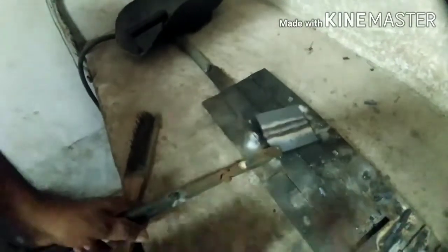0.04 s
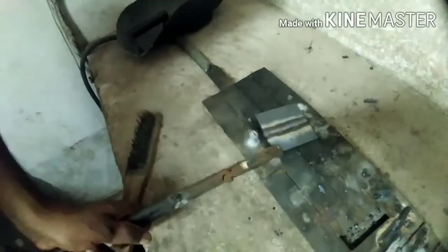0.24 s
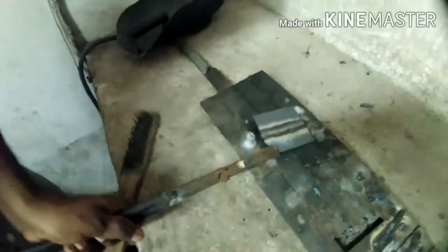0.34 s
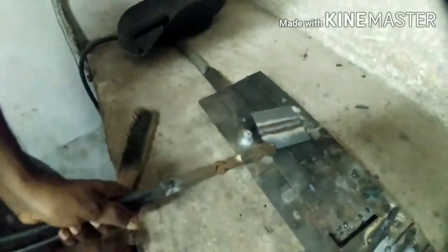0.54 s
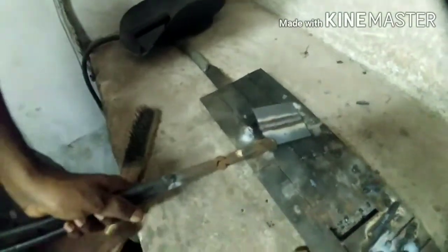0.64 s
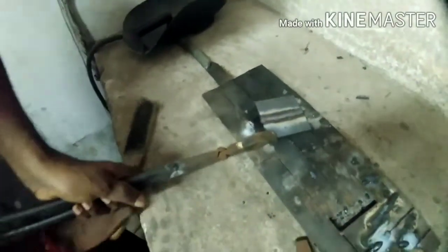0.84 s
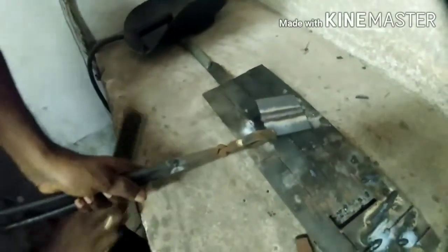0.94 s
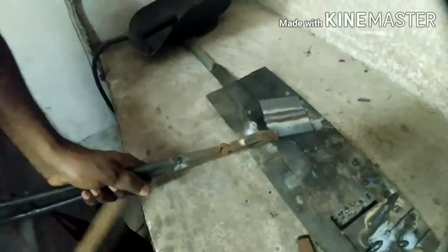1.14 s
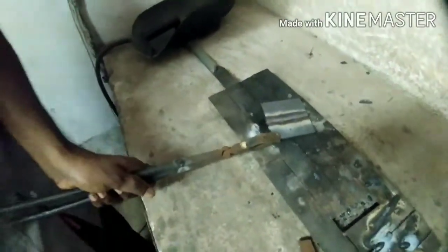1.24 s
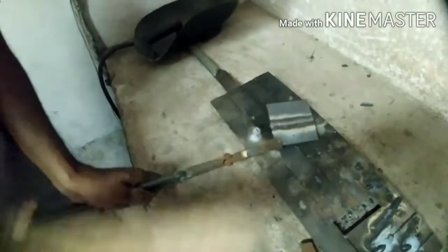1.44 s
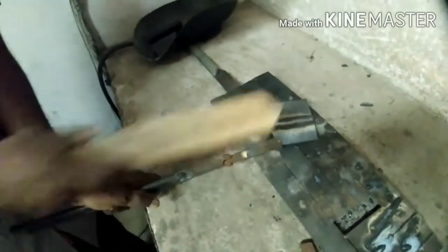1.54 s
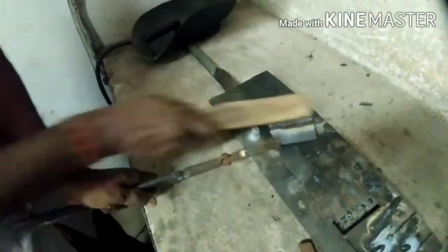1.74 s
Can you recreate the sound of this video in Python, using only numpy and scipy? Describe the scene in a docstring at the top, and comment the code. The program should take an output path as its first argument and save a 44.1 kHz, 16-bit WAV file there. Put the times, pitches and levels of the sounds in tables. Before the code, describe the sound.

Metal tool dropped on a workshop floor, sharp clanks and short high ring over low machine hum

```python
"""Steel tool dropped in a workshop

A steel hand tool falls on concrete: its blows are shaped noise that excites the damped modes of its body.
Bouncing free, the steel rings in bright sines; a wire brush scratches faintly in dense random clicks.
Machines hum, whistle and whine towards the left over a rumble, and a small room answers the blows.
The phone turns down a channel that holds little treble, rounds the peaks and cuts the top."""
import sys
import numpy as np
from scipy import signal
from scipy.fft import rfft, irfft
from scipy.io import wavfile
from scipy.ndimage import uniform_filter1d

SR = 44100
rng = np.random.default_rng(int(sys.argv[2]) if len(sys.argv) > 2 else 0)


def digitize_waveform(pressure):
    """Quantize a signal to 16-bit integers and store it at the path in sys.argv[1].

    Rows of a 2-D input are taken as channels; values are limited to [-1, 1].
    """
    field = np.atleast_2d(pressure).T
    bounded = np.clip(field, -1, 1)
    quanta = np.round(bounded * 32767).astype(np.int16)
    wavfile.write(sys.argv[1], SR, quanta)


N = 79380  # length [samples]

# Band centres of the blow levels: (frequency [Hz])
BAND_HZ = [130, 550, 1800, 3800, 7500, 12500]
# Blows of the tool: (time [s], thud, knock, clank, crack, hiss, sizzle [dB, before the shared colour],
# hold [s], fade to 1/e [s], left over right [dB])
BLOWS = [(0.2378, -28, -18, -6.5, -9, -13, -20, 0.012, 0.011, 2.5),
         (0.273, -31, -29.5, -20.5, -27, -29.5, -33.5, 0.0096, 0.038, 2),
         (0.3396, -25.5, -9, -2.5, -17, -23, -14, 0.0056, 0.0046, 2.5),
         (0.366, -33, -19.5, -6.5, -24.5, -34.5, -24, 0.0033, 0.0036, 1),
         (0.4112, -24.5, -12.5, -15, -25.5, -33, -28.5, 0.0062, 0.0031, 4),
         (0.42, -21.5, -18, -12.5, -7, -13, -11.5, 0.011, 0.012, 2),
         (0.484, -29, -19, -13, -22, -12, -8, 0.0033, 0.015, 2),
         (0.529, -34.5, -25, -29.5, -35, -38, -41, 0.0086, 0.07, -1),
         (0.563, -30.5, -22, -15.5, -28.5, -25.5, -27, 0.011, 0.01, 2.5),
         (0.613, -44, -13.5, -17.5, -24, -21, -34.5, 0.0039, 0.0078, 2.5),
         (0.63, -50.5, -23.5, -17.5, -24.5, -27.5, -27, 0.0058, 0.0076, 3),
         (0.652, -50, -27.5, -23, -30.5, -43, -25, 0.0038, 0.018, 4)]
# Colour shared by all blows: (frequency [Hz], level [dB])
CRASH_COLOUR = [(25, -26), (50, -12), (90, -7), (200, 1.5), (260, -5), (340, 0), (520, -6.5), (800, -2.5),
                (1050, -0.5), (2300, 3), (2900, 1.5), (3700, 3.5), (4900, 1.5), (6200, -2.5), (8500, 4.5),
                (11000, 2.5), (14300, 5.5), (15500, -13)]
CLATTER_DB, GRIT_DB = -3, 1.5  # overall gain; depth of the fast level fluctuation


def clatter():
    """Impact excitation: each blow of steel on concrete is a short gritty burst of broadband noise."""
    gritty_noise = spread(noise()) * amp(GRIT_DB * walk(900))
    equal_per_octave = np.sqrt(SR / 2 / bins() / np.log(2))
    shared_colour = amp(CLATTER_DB + on_bins(CRASH_COLOUR))
    grit = rfft(gritty_noise) * ripple() * equal_per_octave * shared_colour
    out = 0
    for start, *levels, hold, fade, side in BLOWS:
        blow_colour = amp(on_bins(list(zip(BAND_HZ, levels))))
        crash = irfft(grit * blow_colour, N)
        out = out + crash * envelope(start, 0.00074, hold, fade) * pan(side)
    return out


# Hard contacts: (time [s], frequency [Hz], level [dB], t60 [s], left over right [dB])
KNOCKS = [(0.3405, 610.6, -8, 0.018, 1), (0.413, 607, -3.5, 0.013, 0.9), (0.4858, 786, -14.5, 0.014, 0.82),
          (0.6136, 504, -14.5, 0.022, 0.71), (1.4335, 1600, -27.5, 0.017, 18.5)]


def knocks():
    """Damped oscillation: a hard contact gives a broad clack, a cosine that dies rapidly."""
    out = 0
    for start, hz, db, t60, side in KNOCKS:
        wave = np.cos(2 * np.pi * hz * (clock() - start))
        decay = envelope(start, 0.00025, 0.00068, t60 / np.log(1000))
        out = out + amp(db) * wave * decay * pan(side)
    return out


# Modes of the tool's body: (frequency [Hz], level over the crash before BODY_DB [dB], t60 [s])
BODY_MODES = [(470, 8.5, 0.049), (820, -1, 0.028), (1395, -2.5, 0.08), (1627, 4.5, 0.053),
              (1914, 5.5, 0.075), (2177, 2, 0.052), (2422, 5.5, 0.1), (3185, 7.5, 0.059),
              (3530, 11.5, 0.09), (4387, 9, 0.1), (4850, 14.5, 0.11), (5890, 12.5, 0.22), (6885, 9, 0.2),
              (7350, 6, 0.14), (9020, 5.5, 0.19), (10410, 9.5, 0.25), (10750, 9.5, 0.16),
              (12360, 21.5, 0.2), (12490, 7.5, 0.1), (12720, 11.5, 0.17), (13900, 9, 0.14),
              (14110, 10.5, 0.16)]
BODY_DB = -0.5


def body(blows):
    """Modal resonance: the blows excite the damped natural modes of the tool."""
    return amp(BODY_DB) * resonate(blows, BODY_MODES)


# Pitches of the bright steel modes, one for each row of STEEL_MODES: (frequency [Hz])
STEEL_HZ = [6612, 6932, 8838, 9383, 10398, 10745, 11165, 12250, 13780, 14122, 14355]
# Bright steel modes: (level after the bounce [dB], swell [s], hold [s], level as it settles [dB],
# t60 [s], left over right [dB], buzz share [0-1])
STEEL_MODES = [(-15, 0.047, 0.072, -19.5, 0.14, -5, 0.3), (-30.5, 0.02, 0.075, -31, 0.2, -1.5, 0.56),
               (-16, 0.03, 0.089, -18, 0.29, 6, 0.2), (-39.5, 0.003, 0.1, -32.5, 0.21, 2, 0.3),
               (-8, 0.0015, 0.0089, -24, 0.37, -1, 0.1), (-17.5, 0.0016, 0.0081, -37, 0.32, 5.5, 1),
               (-22.5, 0.002, 0.014, -28, 0.25, 6.5, 0.4), (-22, 0.002, 0.028, -45, 0.26, -0.5, 0.3),
               (-22.5, 0.002, 0.011, -44, 0.25, 4.5, 0.4), (-23.5, 0.002, 0.012, -46, 0.26, 3.5, 0.4),
               (-27, 0.002, 0.012, -39.5, 0.2, 9.5, 0.5)]
BOUNCE_S, SETTLE_S, SETTLE_HOLD_S = 0.484, 0.6227, 0.033  # two contacts set the bare steel ringing
WAVER_DB, DRIFT_HZ, BUZZ_PER_S = 2.5, 4, 290


def ring():
    """Free vibration: most upper modes start at once, the lowest swell, and all buzz on the floor."""
    out = 0
    for hz, (db, swell, hold, settle_db, t60, side, buzz) in zip(STEEL_HZ, STEEL_MODES):
        fade = t60 / np.log(1000)
        after_bounce = amp(db) * envelope(BOUNCE_S, swell, hold, fade)
        settling = amp(settle_db) * envelope(SETTLE_S, 0.004, SETTLE_HOLD_S, fade)
        level = np.hypot(after_bounce, settling)  # powers add
        flutter = 1 + buzz * np.array([walk(BUZZ_PER_S), walk(BUZZ_PER_S)])
        out = out + level * flutter * tone(hz, DRIFT_HZ, WAVER_DB) * pan(side)
    return out


# Scratches of the brush and of handling: (time [s], hold [s], rise [s], fade to 1/e [s],
# rub, bristle, wire-tip, sheen [dB], left over right [dB])
SCRATCHES = [(0.0, 0.015, 0.00061, 0.053, -33.5, -46, -53.5, -59, 1.5),
             (0.148, 0.0052, 0.0033, 0.028, -44.5, -50.5, -48, -52, 2.5),
             (0.843, 0.057, 0.024, 0.086, -44.5, -50.5, -52.5, -69, 4.5),
             (0.972, 0.091, 0.048, 0.018, -48.5, -55.5, -52.5, -80, -2),
             (1.427, .008, 0.0022, 0.033, -34, -52.5, -59.5, -53, 27),
             (1.464, 0.12, 0.016, 0.028, -44.5, -44.5, -48, -44.5, 7),
             (1.654, 0.04, 0.03, 0.057, -47, -64.5, -61.5, -52, -0.5)]
# Colours of the four layers: (frequency [Hz], level [dB per Hz])
RUB = [(150, -18.5), (450, -2), (800, -4), (1400, 1), (2300, -5), (3200, -21.5), (8000, -45.5)]
BRISTLE = [(1200, -29.5), (2400, 8.5), (3000, -15), (3550, 2.5), (4150, -2.5), (4850, -4.5), (5500, -9.5),
           (6500, -10.5), (8000, -20), (12000, -33)]
TIPS = [(5000, -30.5), (7800, -6.5), (9300, 1), (10800, 3), (12300, 1), (13500, -7), (15000, -26)]
SHEEN = [(10000, -33.5), (12200, -1.5), (14400, 1), (15500, 1.5)]
# Resonances of the brush wires: (frequency [Hz], level over the scratching [dB], t60 [s])
WIRES = [(2440, 2, 0.022), (3492, 11.5, 0.064), (4820, 12, 0.066), (5760, 13.5, 0.047), (6640, 11, 0.043),
         (9246, 5, 0.023), (10260, 5.5, .03), (12300, 2, .03)]
BRISTLE_PER_S, BRISTLE_SCATTER_DB = 5200, -1.5  # mean click rate; random spread of click level


def brush():
    """Stick-slip friction: wires catch and flick in dense clicks over the dull rub of the handle."""
    struck = rng.random(N) < BRISTLE_PER_S / SR
    flicks = struck * amp(BRISTLE_SCATTER_DB * rng.standard_normal(N))
    clicks = spread(unit(flicks * noise()) + 0.33 * noise()) * amp(1.4 * walk(120))
    clicks = irfft(rfft(clicks + resonate(clicks, WIRES)) * ripple(), N)
    layers = [colour(spread(noise()), RUB)]
    layers += [colour(clicks, points) for points in (BRISTLE, TIPS, SHEEN)]
    out = 0
    for start, hold, rise, fade, *levels, side in SCRATCHES:
        scratch = sum(amp(db) * layer for db, layer in zip(levels, layers))
        out = out + scratch * envelope(start, rise, hold, fade) * pan(side)
    return out


# Ticks of single wires: (time [s], level [dB], left over right [dB])
TICKS = [(0.8768, -36.5, 2.3), (0.991, -45, 3.8), (1.0167, -36.5, 4.9), (1.0405, -38, 6), (1.056, -44, 3.9),
         (1.082, -50, 19), (1.1169, -51, 16)]
# Colour of the ticks: (frequency [Hz], level [dB per Hz])
TICK_COLOUR = [(1000, -12), (3000, -9), (4400, 0), (6300, -9.5), (8000, -1), (11500, 1), (15500, -22)]


def ticks():
    """Elastic release: single wires snap free, each a sharp bright burst of noise."""
    bursts = 0
    for start, db, side in TICKS:
        bursts = bursts + amp(db) * envelope(start, 0.00048, 0.00063, 0.0038) * pan(side)
    return colour(spread(noise()), TICK_COLOUR) * bursts


# Answer of the room: (frequency [Hz], t60 [s], level [dB])
ROOM = [(130, 0.16, -1.5), (549, 0.55, -6), (1815, 0.32, -10), (3840, 0.63, -8), (7600, 0.18, -12),
        (12500, 0.38, -9.5)]
RING_ROOM_DB, ROOM_RISE_S = -1, 0.013  # gain of the ringing into the room; build-up of the answer


def room(x):
    """Diffuse reverberation: convolution with noise that decays at its own rate in each band."""
    hiss, tail = spread(noise()), 0
    for hz, t60, db in ROOM:
        share = on_bins([(row[0], row[0] == hz) for row in ROOM])  # overlapping triangular bands
        decay = unit(envelope(0, ROOM_RISE_S, 0, t60 / np.log(1000))) / np.sqrt(N)
        tail = tail + amp(db) * share * rfft(hiss * decay)
    return irfft(rfft(x) * tail, N)


# Steady machine tones: (frequency [Hz], level [dB], left over right [dB])
HUM = [(106.3, -55.5, 1.5), (170.2, -48.5, 3.5), (1000, -53, 6), (970, -64.5, 7), (1026, -56, 11),
       (1310, -55.5, 14.5), (1846, -55.5, 14.5), (2140, -63.5, 13.5)]
# Motor whine, which rises and sags: (time [s], frequency [Hz], level [dB])
WHINE = [(0, 1500, -55), (0.18, 1570, -46.5), (.7, 1830, -45), (0.881, 1790, -47), (0.969, 1775, -39.5),
         (1.058, 1720, -41), (1.15, 1630, -43.5), (1.249, 1600, -64), (1.549, 1680, -54), (1.68, 1590, -46),
         (1.8, 1520, -52)]
# Whistle of steady pitch: (time [s], level [dB])
WHISTLE = [(0, -78), (.9, -60), (1.12, -49.5), (1.35, -47.5), (1.56, -42.5), (1.8, -44)]
# Colours of the machine rush and the workshop rumble: (frequency [Hz], level [dB per Hz])
RUSH = [(500, -23.5), (880, -12.5), (1150, 3), (1450, -15), (1800, -3), (2050, -19), (2700, -19),
        (4000, -37.5), (12000, -36.5)]
RUMBLE = [(25, -17.5), (55, -21), (90, 3), (130, -6.5), (280, -8.5), (500, -7), (800, -19.5), (2000, -29.5),
          (4000, -42.5), (8000, -49), (15000, -50.5)]
WHISTLE_HZ, WHINE_WIDTH_HZ, WHINE_BLUR_PER_S = 1204, 55, 900
RUMBLE_DB, RUSH_DB, MACHINE_PAN_DB = -47.5, -46.5, 9.5  # positive pan is to the left


def machines():
    """Periodic and turbulent sources: hum, whistle, whine and rush over the rumble of the workshop."""
    t = clock()
    hum = sum(amp(db) * tone(hz, drift_hz=1.5, waver_db=2.0) * pan(side) for hz, db, side in HUM)
    when, pitch, level = np.array(WHINE).T
    blurred_pitch = np.interp(t, when, pitch) + WHINE_WIDTH_HZ * walk(WHINE_BLUR_PER_S)
    whine = amp(np.interp(t, when, level)) * tone(blurred_pitch, drift_hz=8, waver_db=1.5)
    whistle_level = amp(np.interp(t, *np.array(WHISTLE).T))
    whistle = whistle_level * tone(WHISTLE_HZ, drift_hz=2.6, waver_db=3.5)
    rush = amp(RUSH_DB + 0.47 * walk(5.2)) * colour(noise(), RUSH)
    rumble = amp(RUMBLE_DB) * colour(spread(noise()), RUMBLE)
    return hum + (whine + whistle + rush) * pan(MACHINE_PAN_DB) + rumble


PORT_PHASE_RAD = 1.69  # phase between the two ports from 1 kHz up


def tone(hz, drift_hz, waver_db):
    """Phase integration: an unsteady sine whose phase between ports grows with pitch up to 1 kHz."""
    phase = 2 * np.pi * np.cumsum(hz + drift_hz * walk(30)) / SR + rng.uniform(0, 2 * np.pi)
    lag = np.array([[0], [PORT_PHASE_RAD * min(np.mean(hz) / 1000, 1)]])
    wave = np.sqrt(2) * np.sin((phase + lag).astype(np.float32))
    return wave * amp(waver_db * walk(50.06))


def resonate(x, modes):
    """Modal superposition: a sound rings a set of damped resonances."""
    answer = 0
    for centre, db, t60 in modes:
        detuning = 2j * np.pi * (bins() - centre)
        answer = answer + amp(db) / (1 + detuning * abs(t60) / np.log(1000))
    return irfft(rfft(x) * answer, N)


RIPPLE_DB, RIPPLE_WIDTH_HZ = 3.5, 110  # depth and width of random spectral unevenness


def ripple():
    """Random spectral colouring: irregular peaks and dips along the frequency axis."""
    bumps = walk(SR * SR / N / RIPPLE_WIDTH_HZ)[:N // 2 + 1]
    return amp(RIPPLE_DB * (bumps - 1.0))


# Likeness of the two channels: (frequency [Hz], correlation [0-1])
LIKENESS = [(100, 1), (500, 0.59), (1500, 0), (4000, 0.3), (12000, 0)]


def spread(x):
    """Interchannel coherence: two unrelated signals become a stereo pair most alike in the bass."""
    like = np.clip(on_bins(LIKENESS), -1, 1)
    mid, side = rfft(x) * np.sqrt([1 + like, 1 - like])
    return unit(irfft(np.array([mid + side, mid - side]), N))


def colour(x, points):
    """Spectral filtering: give a sound a spectrum, at rms 1."""
    return unit(irfft(rfft(x) * amp(on_bins(points)), N))


def envelope(start, rise, hold, fade):
    """Exponential decay: linear attack, then a hold counted from the start, then release."""
    out, first = np.zeros(N), max(int(start * SR), 0)
    last = min(first + int((abs(hold) + 10 * abs(fade)) * SR) + 1, N)
    age = np.arange(first, last) / SR - start
    attack = np.clip(age / max(rise, 1e-4), 0, 1)
    out[first:last] = attack * np.exp(-np.maximum(age - hold, 0) / max(fade, 1e-3))
    return out


def walk(rate):
    """Random modulation: smoothed random steps, rate per second, at rms 1."""
    k = max(int(SR / rate), 1)
    steps = np.repeat(rng.standard_normal(N // k + 1), k)
    return unit(uniform_filter1d(steps, k)[:N])


def noise():
    """Statistical independence: two unrelated white noises."""
    return rng.standard_normal((2, N))


def pan(db):
    """Level difference between channels: left and right gains of constant total power."""
    return unit(amp(np.array([[db], [-db]]) / 2))


def on_bins(points):
    """Logarithmic frequency scale: read (frequency [Hz], value) points at each bin."""
    hz, value = np.array(points, float).T
    return np.interp(np.log(bins()), np.log(hz), value)


def bins():
    """Discrete spectrum: frequency of each bin, offset by 1 Hz to avoid zero."""
    return np.arange(N // 2 + 1) * SR / N + 1


def clock():
    """Sampling: time of each sample in seconds."""
    return np.arange(N) / SR


def unit(x):
    """Normalisation: scale to rms 1."""
    return x / np.sqrt(np.mean(x ** 2))


def amp(db):
    """Logarithmic level: decibels to gain."""
    return np.exp(np.asarray(db) * (np.log(10) / 20))


def scene():
    """Superposition: the falling tool in its room, the brush and the machines."""
    blows, bright = clatter(), ring()
    crash = blows + knocks() + body(blows)
    answer = room(crash + amp(RING_ROOM_DB) * bright)
    return crash + bright + answer + brush() + ticks() + machines()


GATE_ABOVE_HZ, GATE_DB, GATE_DEPTH_DB = 3330, -61.5, 14.5  # treble edge, threshold, greatest cut
GATE_SLOPE = 3.8  # dB of cut per dB below the threshold
CEILING, TOP_HZ = 1.03, 15150  # limit of the rounded peaks before the low-pass; its edge


def record(dry):
    """Expansion, saturation and band limiting: low-treble channels drop, peaks round, the top is cut."""
    high_pass = signal.butter(4, GATE_ABOVE_HZ, "high", fs=SR, output="sos")
    treble = signal.sosfilt(high_pass, dry)
    treble_power = np.abs(uniform_filter1d(treble ** 2, size=2600, axis=1))
    level_db = 10 * np.log10(treble_power + 1e-12)
    cut_db = np.clip(GATE_SLOPE * (GATE_DB - level_db), 0, abs(GATE_DEPTH_DB))
    rounded = CEILING * np.tanh(dry * amp(-cut_db) / CEILING)
    low_pass = signal.ellip(8, .2, 70, TOP_HZ, fs=SR, output="sos")
    return signal.sosfilt(low_pass, rounded)


dry = scene()
out = record(dry)
digitize_waveform(out)
```